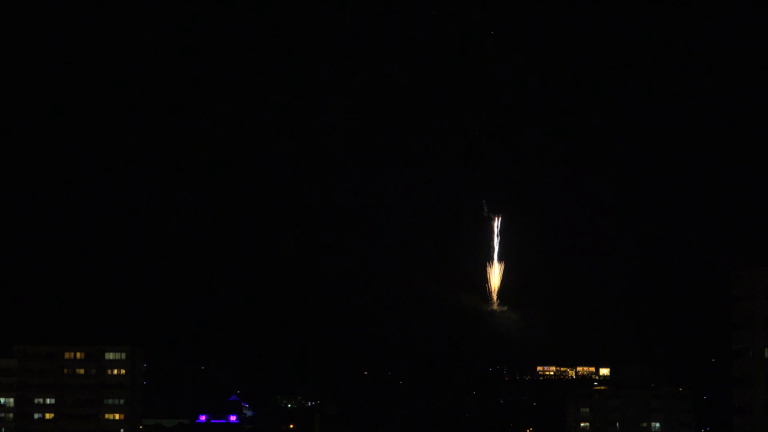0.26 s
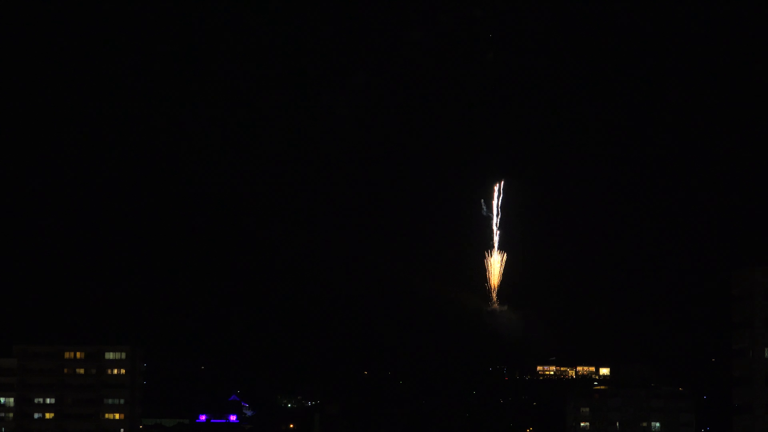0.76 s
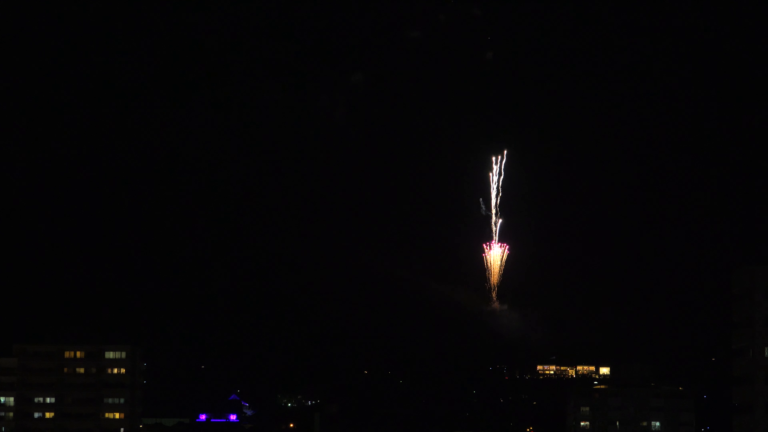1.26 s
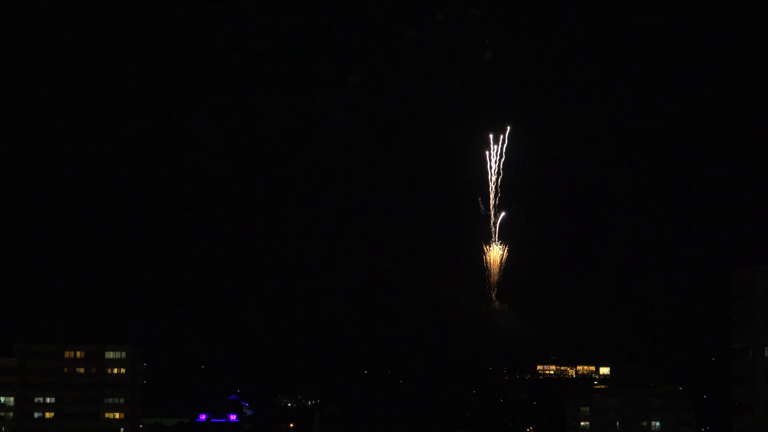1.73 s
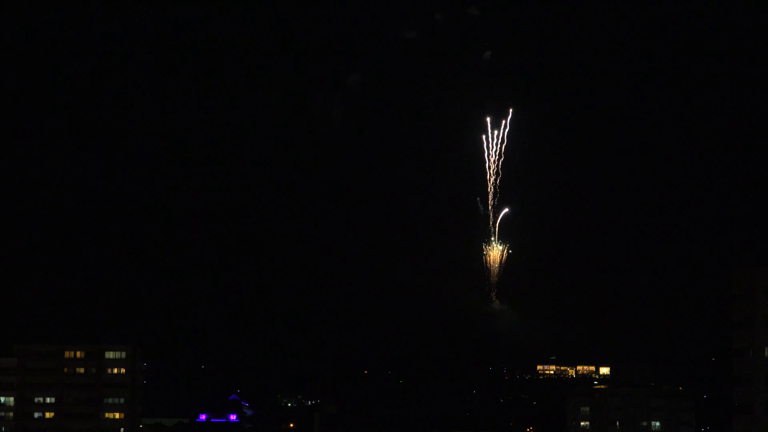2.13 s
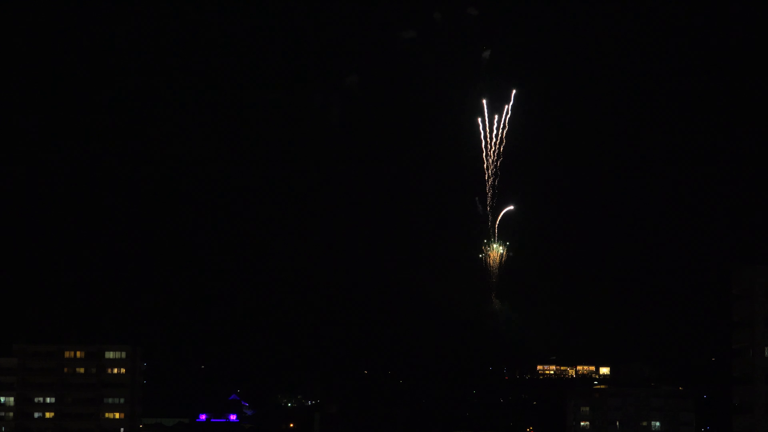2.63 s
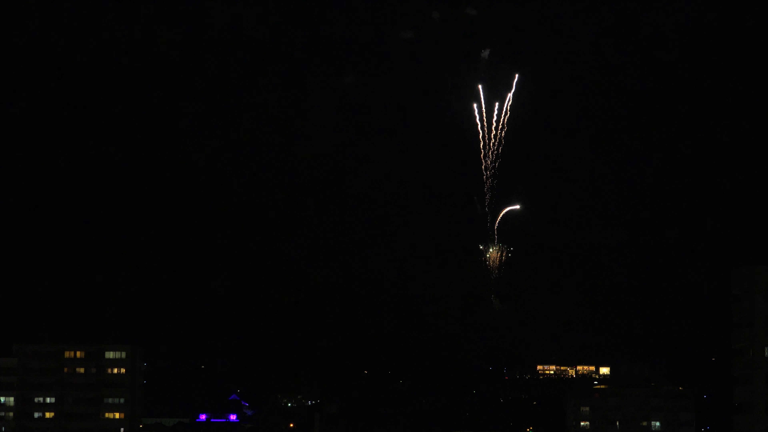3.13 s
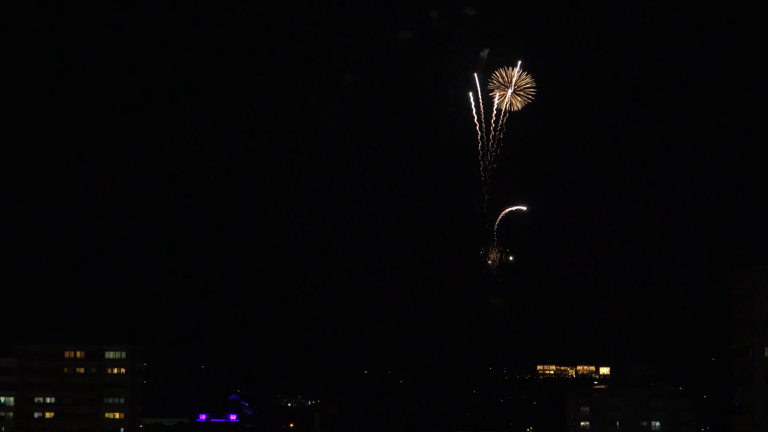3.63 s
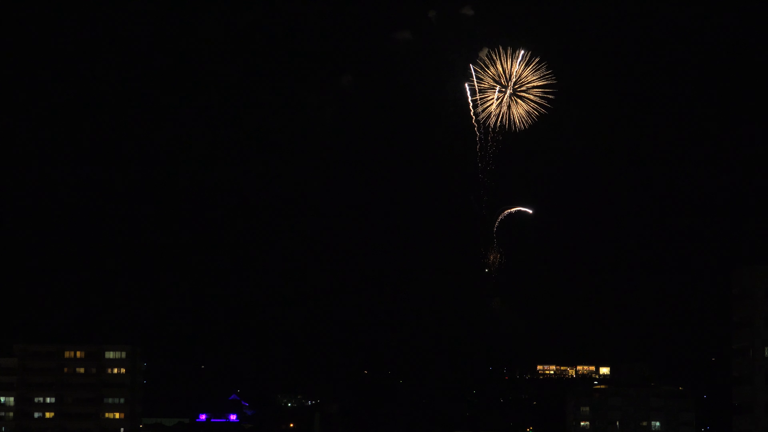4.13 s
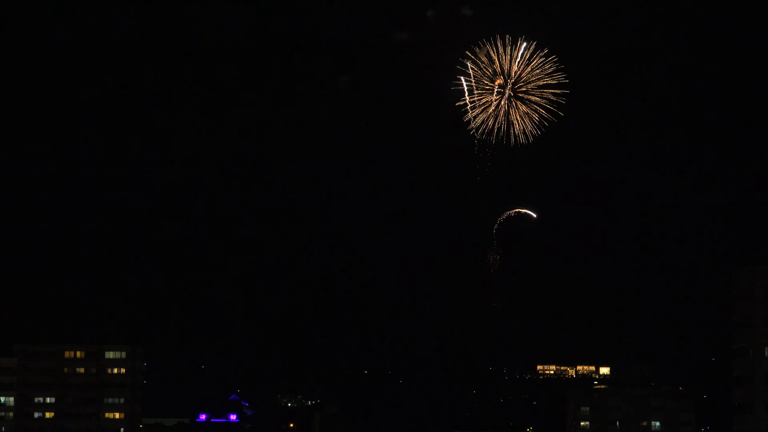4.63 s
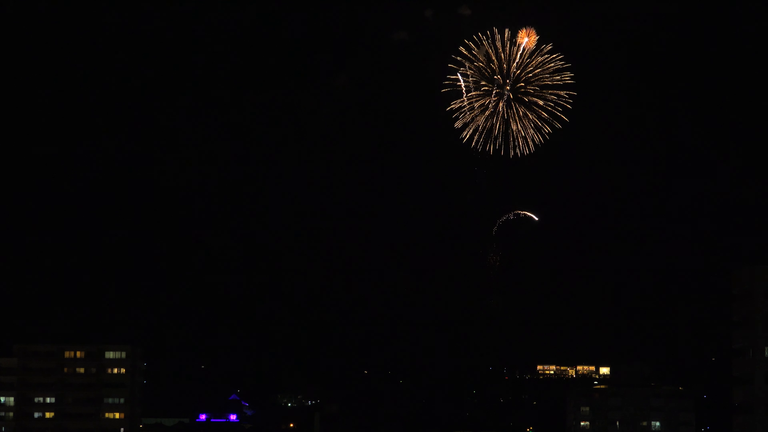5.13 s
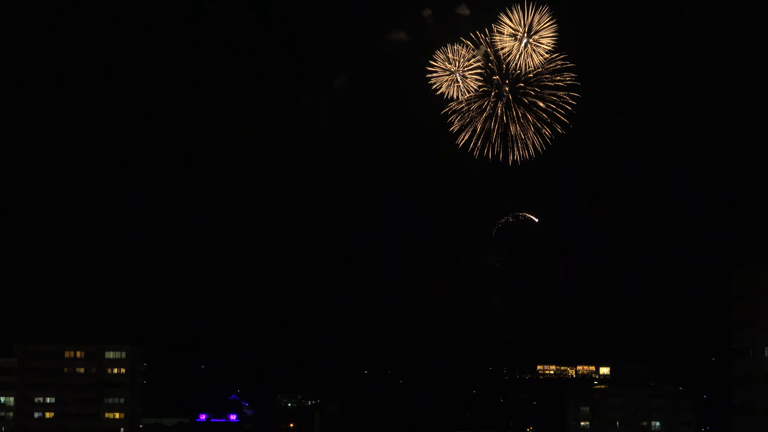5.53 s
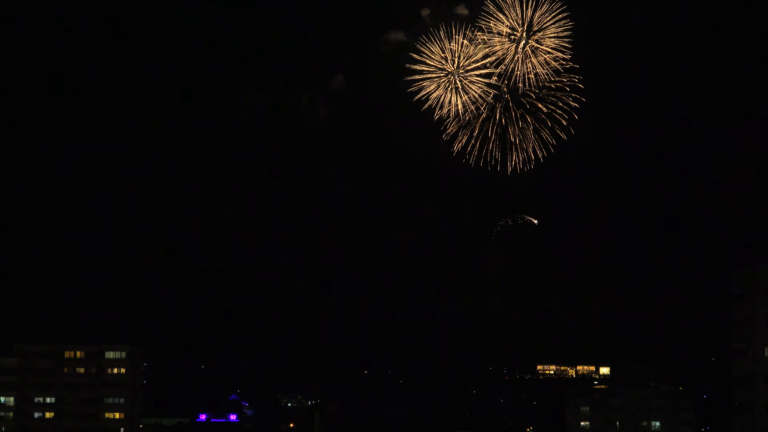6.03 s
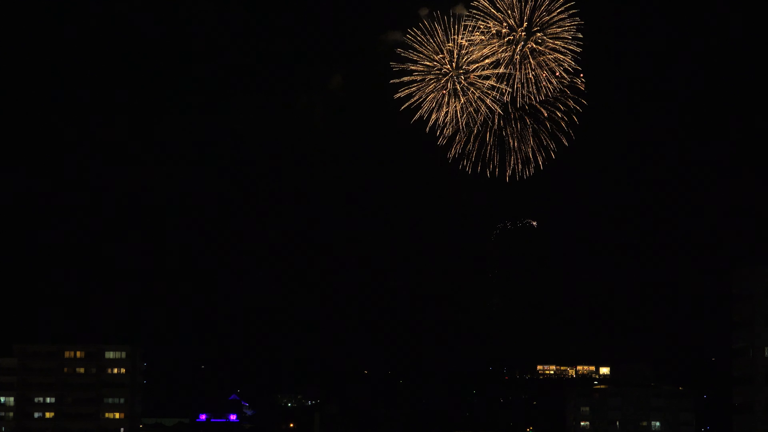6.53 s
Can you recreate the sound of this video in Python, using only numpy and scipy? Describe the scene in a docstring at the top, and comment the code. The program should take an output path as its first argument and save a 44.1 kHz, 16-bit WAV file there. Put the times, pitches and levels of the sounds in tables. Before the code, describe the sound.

A low, steady city hum is heard from a high balcony at night with faint hiss. About a second in, a distant firework shell bangs, slaps off close walls, makes the recess boom, and rolls back in thundery swells. A louder, sharper second bang follows near four seconds with similar echoes. Afterwards vehicles pass below, tyres roaring softly. Stereo microphone in the recess, weighted to the left.

```python
"""City traffic hums below a balcony at night, under a faint hiss and whine, and swells as vehicles pass.
Two distant firework shells burst: each shock front slaps off the near walls and sets the recess booming.
Single echoes and thunder with three swells then roll back from the city.
Hum, hiss and thunder are shaped noise, the whine is sine tones, and the bursts are computed blast waves."""
import sys
import numpy as np
from scipy import signal
from scipy.fft import rfft, irfft
from scipy.io import wavfile
from scipy.ndimage import uniform_filter1d

SR = 44100
rng = np.random.default_rng(int(sys.argv[2]) if len(sys.argv) > 2 else 0)


def persist_wave(psi):
    """Save psi, clipped to +-1, as 16-bit WAV."""
    counts = np.round(np.clip(psi, -1, 1) * 32767).astype(np.int16)
    wavfile.write(sys.argv[1], SR, np.atleast_2d(counts).T)


N = 298557
TIME = np.arange(N) / SR  # seconds


def from_db(db):
    """Turn decibels into a gain; 20 dB is ten times the amplitude."""
    return 10 ** (np.asarray(db) / 20)


def rms_one(x):
    """Scale a sound to an average (rms) strength of 1."""
    return x / np.sqrt(np.mean(x ** 2) + 1e-20)


def panned(pan_db):
    """Left and right gains; a positive level difference favours the left."""
    return from_db(np.array([[0.5], [-0.5]]) * pan_db)


def cut(x, hz, kind, order=2):
    """Keep only what lies above ("high") or below ("low") a pitch; a higher order cuts more steeply."""
    edge_hz = np.clip(hz, 10, 0.45 * SR)
    return signal.sosfilt(signal.butter(order, edge_hz, kind, fs=SR, output="sos"), x + 1e-18)


def delayed(x, seconds):
    """The same sound, arriving later."""
    return np.interp(TIME - seconds, TIME, x, left=0)


def resonance(x, hz, width_hz):
    """Ring at one pitch with gain 1 at its peak; a narrower width rings longer."""
    radius = np.exp(-np.pi * width_hz / SR)
    feed = np.array([1, 0, -1]) * (1 - radius ** 2) / 2
    feedback = [1, -2 * radius * np.cos(2 * np.pi * hz / SR), radius ** 2]
    return signal.lfilter(feed, feedback, x + 1e-18)


def stereo_noise(mid, side, alike):
    """Mix two unrelated noises into left and right; 1 makes the sides the same, 0 unrelated."""
    return np.sqrt(1 + alike) * mid + np.sqrt(1 - alike) * side * [[1], [-1]]


# how alike left and right are: pitch_hz, likeness (limited to -1..1 when played)
LIKENESS = [(40, 1.8), (80, 0.68), (250, 0.84), (600, 0.7), (1100, 0.73), (2000, 0.38), (4000, 0),
            (9000, -0.07)]
# how much stronger the left is: pitch_hz, left_minus_right_db
BALANCE = [(50, 8.7), (130, 4.4), (280, 4.1), (500, 1.2), (1000, 3), (2000, 3), (4000, 1.4), (10000, .4)]


def diffuse(spectrum):
    """Noise from all around, rms 1: alike in the bass, unrelated in the treble, stronger on the left."""
    octaves = np.log2(np.fft.rfftfreq(N, 1 / SR) + 1)

    def curve(table):
        pitch_hz, value = np.array(table).T
        return np.interp(octaves, np.log2(pitch_hz), value)

    lowest, highest = np.log2(spectrum[0][0]), np.log2(spectrum[-1][0])
    octaves_outside = np.abs(octaves - np.clip(octaves, lowest, highest))
    colour_db = curve(spectrum) - 36 * octaves_outside  # fades 36 dB per octave past the table's ends
    mid, side = rfft(rng.standard_normal((2, N)))
    both = stereo_noise(mid, side, np.clip(curve(LIKENESS), -1, 1))
    return rms_one(irfft(both * from_db(colour_db) * panned(curve(BALANCE)), N))


def evened(x, seconds):
    """Noise with its slow swells taken out, by dividing by its own running strength."""
    power = uniform_filter1d(np.mean(x ** 2, axis=0), max(int(seconds * SR), 2))
    return x / np.sqrt(power + 1e-12)


def passing(nearest_s, crossing_s):
    """Gain of a source moving steadily along a straight road; 1 when nearest."""
    distance = np.hypot(1, (TIME - nearest_s) / crossing_s)  # 1 is the nearest distance
    fall_db = 27.5  # loss per tenfold distance
    return from_db(-fall_db * np.log10(distance))


# tone colour of the city hum, the tyre roar and the tread hiss: pitch_hz, relative_level_db (per Hz)
CITY = [(20, -27), (40, -10), (80, 0.5), (125, -5), (175, 0), (235, 2.5), (330, -5), (550, -7), (750, -7.5),
        (1000, -7.5), (1400, -9), (2600, -27), (4000, -34), (7000, -49)]
TYRES = [(150, -29), (400, -8.5), (600, -6), (850, -2), (1350, -8), (1900, -15.5), (2800, -25.5),
         (4000, -31.5), (6300, -43.5), (8000, -49)]
SPRAY = [(1500, -1.5), (2600, 5.5), (3800, 0), (5000, -5), (6400, -3.5), (7300, -14.5), (9000, -28)]
# vehicles on the road: nearest_s, crossing_s (time to cover its nearest distance from the balcony),
# roar_db, tread_db (both levels when nearest)
VEHICLES = [(3.1, 1.0, -56, -71), (5.3, 1.27, -44.5, -73.5), (6.502, 0.74, -46.5, -62.5)]


def traffic():
    """The city's steady hum, plus tyre roar and tread hiss that grow as each vehicle nears."""
    roar_power = tread_power = 0
    for nearest_s, crossing_s, roar_db, tread_db in VEHICLES:
        nearness = passing(nearest_s, crossing_s)
        # separate vehicles add up by power
        roar_power += (nearness * from_db(roar_db)) ** 2
        tread_power += (nearness * from_db(tread_db)) ** 2
    roar = np.sqrt(roar_power) * diffuse(TYRES)
    tread = np.sqrt(tread_power) * diffuse(SPRAY)
    hum = from_db(-44) * evened(diffuse(CITY), seconds=0.25)
    return hum + roar + tread


# tone colour of the recorder's hiss: pitch_hz, relative_level_db (per Hz)
HISS = [(3000, -6.5), (7000, 2), (9000, -1), (11000, -3), (12100, 2), (13000, -3), (13500, -3),
        (14000, -5.5)]


def hiss():
    """The recorder's own faint noise."""
    return from_db(-78) * diffuse(HISS)


# steady electronic tones: pitch_hz, level_db (rms)
WHINE = [(4000, -91.5), (6000, -96), (10000, -103), (13937, -103)]


def whine():
    """Thin electronic whine, a sum of sine waves; each peaks at root 2 times its rms."""
    return sum(np.sqrt(2) * from_db(level_db) * np.sin(2 * np.pi * hz * TIME) for hz, level_db in WHINE)


def shock(start_s, level_db, push_ms, edge_hz):
    """Blast wave: a jump, a short push, a longer suction; air rounds its front, leaving a faint snap."""
    age = np.maximum(TIME - start_s, 0) / (push_ms / 1000)  # counted in push lengths
    wave = (TIME >= start_s) * (1 - age) * np.exp(-np.minimum(age, 40))
    rounded = cut(wave, edge_hz, "low", order=6)
    snap = cut(cut(wave, hz=1600, kind="high"), 1.8 * edge_hz, "low", order=6)
    return from_db(level_db) * (rounded + from_db(-13.5) * snap)


# pitches at which the air in the recess rings: pitch_hz, width_hz, left_db, right_db
RECESS = [(54, 14, 8.5, 8.5), (76.5, 18, 13, 7.5), (98.2, 6.8, 16, 5.5), (175.3, 8, 7, 2.5),
          (289.5, 13.4, 17, 8.5), (359, 32, 8, 3.5), (447, 52, -3, 2), (755, 39, 2, 6),
          (1280, 67, -10, -20.5)]


def recess(x):
    """The air between the balcony's walls rings at several pitches at once."""
    return sum(from_db([[left_db], [right_db]]) * resonance(x, hz, width_hz)
               for hz, width_hz, left_db, right_db in RECESS)


def scatter(x, level_db, t60, rise_s, alike):
    """Countless small reflections: noise that builds up, then fades by 60 dB every t60 seconds."""
    age_s = TIME[:SR // 2]
    mid, side = rng.standard_normal((2, len(age_s)))
    envelope = (1 - np.exp(-age_s / rise_s)) * np.exp(-np.log(1000) * age_s / t60)
    tail = stereo_noise(mid, side, alike) * envelope
    reflections = rms_one(tail) / np.sqrt(len(age_s))
    return from_db(level_db) * signal.fftconvolve(x[None], reflections, axes=1)[:, :N]


# shell bursts: start_s, level_db (pressure), push_ms, treble_edge_hz, recess_boom_db, scattered_db, thunder_db
SHELLS = [(0.9920, -9, 2.34, 1320, 4, 5, -0.5), (3.865, -3.5, 1.62, 1280, 1.5, 1.5, 0.5)]
# slaps off the near walls, one list per shell as each comes from its own direction:
# delay_ms, left_db, right_db
WALLS = [
    [(2.31, 1.5, -7), (5.24, -1, -1), (6.7, 0.5, -3), (9.5, -20, -22), (12.92, -1, -3.5), (30.55, -11, -14)],
    [(2.46, -8, -11), (5.49, 3.5, -1.5), (8.6, -19, -10), (10.7, -10, -16), (21.86, -14.5, -13),
     (28.7, -20, -17.5)],
]


def bursts():
    """Each front arrives directly, off the near walls, as a short wash and through the ringing recess."""
    sound = 0
    for (start_s, level_db, push_ms, edge_hz, boom_db, scatter_db, _), walls in zip(SHELLS, WALLS):
        front = shock(start_s, level_db, push_ms, edge_hz)
        # short waves travel as rays; long ones fill the recess
        crack = cut(front, hz=149, kind="high", order=1)
        slaps = sum(from_db([[left_db], [right_db]]) * delayed(crack, delay_ms / 1000)
                    for delay_ms, left_db, right_db in walls)
        splash = from_db(scatter_db) * cut(crack, hz=285, kind="high")  # scattered by ledges and rails
        dull_splash = cut(splash, hz=990, kind="low", order=1)
        near = scatter(splash, level_db=-2.5, t60=0.12, rise_s=0.0068, alike=0.52)
        far = scatter(dull_splash, level_db=1.5, t60=0.47, rise_s=0.011, alike=0.64)
        boom = from_db(boom_db) * recess(front)
        sound = sound + (crack + near + far) * panned(pan_db=2.5) + slaps + boom
    return sound


def thunder_gain(age_s, start_db, fade_db_per_s, swells):
    """Echo strength after a burst: a steady fade, with a bell-shaped swell from each district."""
    power = from_db(start_db - fade_db_per_s * np.maximum(age_s, 0)) ** 2
    for delay_s, spread_s, level_db in swells:
        power = power + from_db(level_db) ** 2 * np.exp(-0.5 * ((age_s - delay_s) / spread_s) ** 2)
    wait_s, rise_s = 0.028, 0.07  # silence, then a steady build-up
    return np.sqrt(power) * np.clip((age_s - wait_s) / rise_s, 0, 1)


# tone colour of the deep rumble and the higher clatter: pitch_hz, relative_level_db (per Hz)
RUMBLE = [(20, -28), (32, -22), (55, -6.5), (78, -2), (98, 2.5), (120, -8.5), (145, -31), (260, -42)]
CLATTER = [(90, -26), (140, -10.5), (174, 3), (225, -14), (283, -4), (330, -10), (430, -11.5), (600, -15.5),
           (900, -18.5), (1400, -27.5), (2500, -45)]
# groups of buildings that return every burst as a swell:
# delay_s, spread_s, rumble_db, clatter_db, second_shell_minus_first_db
DISTRICTS = [(0.16, 0.042, -31.5, -43.5, 5.5), (0.57, 0.04, -30.5, -36, 0), (0.8, 0.035, -38, -40.5, -1)]


def roll():
    """Countless echoes merge into thunder; the same city answers each burst in nearly the same way."""
    delay_s, spread_s, rumble_db, clatter_db, contrast_db = np.transpose(DISTRICTS)
    rumble_power = clatter_power = 0
    for (start_s, *_, thunder_db), share in zip(SHELLS, (-0.5, 0.5)):
        age_s, gain = TIME - start_s, from_db(thunder_db)
        lift_db = share * contrast_db  # half the difference down for the first shell, half up for the second
        rumble_swells = zip(delay_s, spread_s, rumble_db + lift_db)
        clatter_swells = zip(delay_s, spread_s, clatter_db + lift_db)
        rumble_gain = thunder_gain(age_s, start_db=-35.5, fade_db_per_s=7, swells=rumble_swells)
        clatter_gain = thunder_gain(age_s, start_db=-37.5, fade_db_per_s=6.3, swells=clatter_swells)
        rumble_power += (gain * rumble_gain) ** 2
        clatter_power += (gain * clatter_gain) ** 2
    rumble = evened(diffuse(RUMBLE), seconds=0.045)
    clatter = evened(diffuse(CLATTER), seconds=0.052)
    return np.sqrt(rumble_power) * rumble + np.sqrt(clatter_power) * clatter


# distinct echoes off large buildings: start_s, level_db (pressure), treble_edge_hz
ECHOES = [(1.046, -16, 250), (1.108, -18, 237), (1.508, -19.5, 620), (1.529, -23, 400), (1.579, -28, 160),
          (1.756, -30, 500), (2.101, -23, 200), (2.151, -31, 200), (2.776, -28.5, 200), (4.232, -27.5, 450),
          (4.396, -24, 506), (4.438, -24, 360), (4.658, -24.5, 895), (4.792, -29.5, 497),
          (4.985, -26.5, 350)]


def echoes():
    """Large buildings return duller, thinner copies of the front, smeared by their uneven faces."""
    fronts = sum(shock(start_s, level_db, push_ms=2.4, edge_hz=edge_hz)
                 for start_s, level_db, edge_hz in ECHOES)
    knocks = cut(fronts, hz=200, kind="high")
    smear = scatter(knocks, level_db=0.5, t60=0.054, rise_s=0.0017, alike=0.55)
    boom = cut(recess(fronts), hz=66, kind="high", order=3)
    return (knocks + smear) * panned(pan_db=9.0) + boom


def scene():
    """Blasts, short of deepest bass and one low band, sound over the thunder and traffic."""
    blasts = cut(bursts() + echoes(), hz=33.3, kind="high", order=3)
    # a wall's reflection partly cancels this band at the microphone: 6 dB less at its centre
    blasts = blasts - (1 - from_db(-6)) * resonance(blasts, hz=131, width_hz=78)
    return traffic() + blasts + roll()


def record(dry):
    """The recorder adds its hiss and whine, fades in over 4 ms, and cuts the top sharply."""
    fade_in = np.minimum(TIME / 0.004, 1)
    noisy = fade_in * (dry + hiss() + whine())
    # steep low-pass at 14200 Hz: 0.2 dB ripple below, 80 dB down above
    return signal.sosfilt(signal.ellip(10, 0.2, 80, 14200, fs=SR, output="sos"), noisy)


dry = scene()
out = record(dry)
persist_wave(out)
```